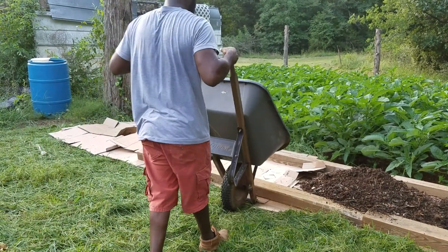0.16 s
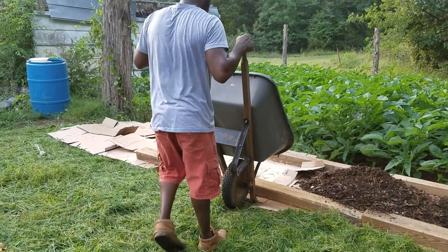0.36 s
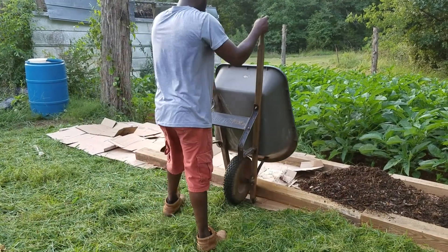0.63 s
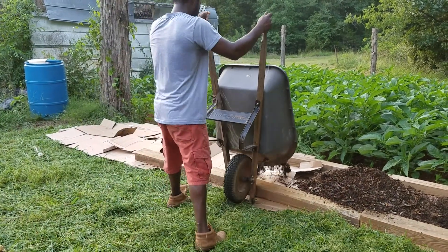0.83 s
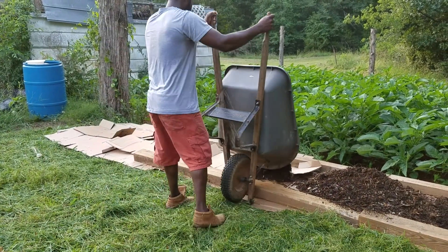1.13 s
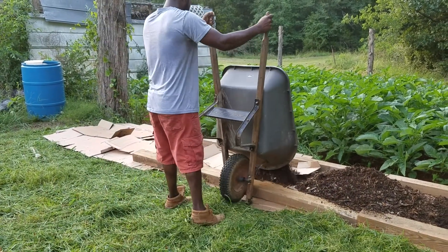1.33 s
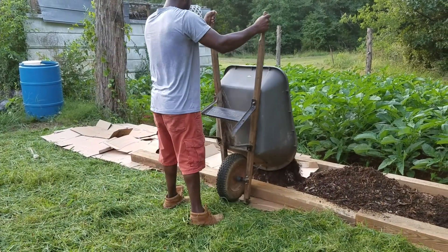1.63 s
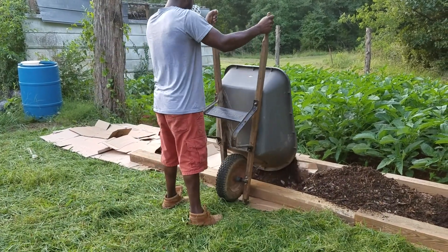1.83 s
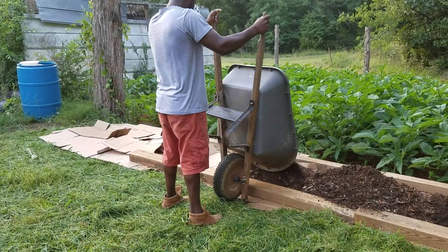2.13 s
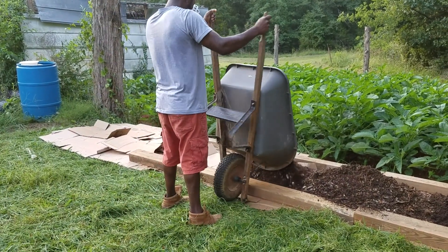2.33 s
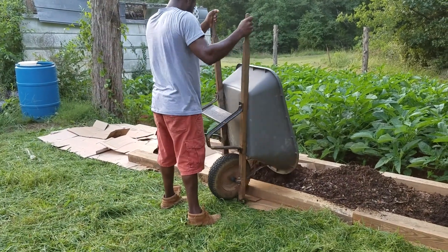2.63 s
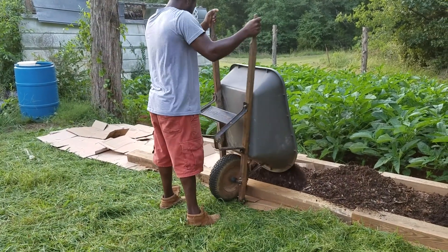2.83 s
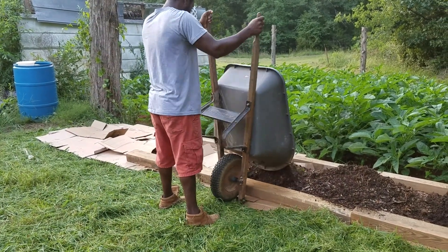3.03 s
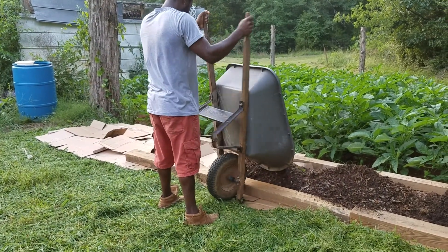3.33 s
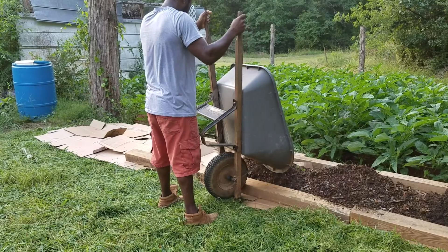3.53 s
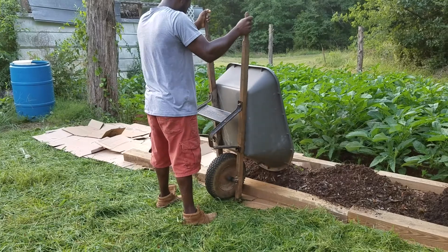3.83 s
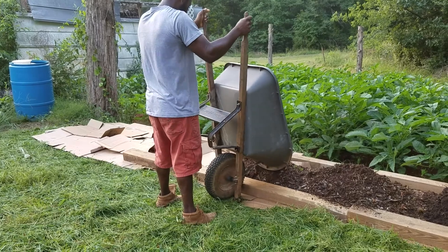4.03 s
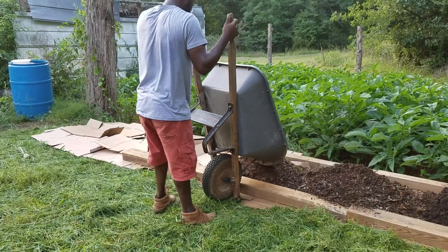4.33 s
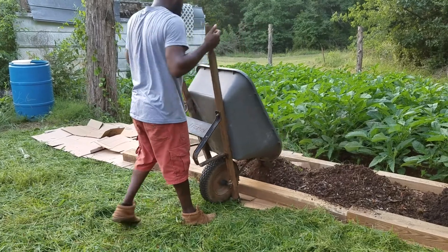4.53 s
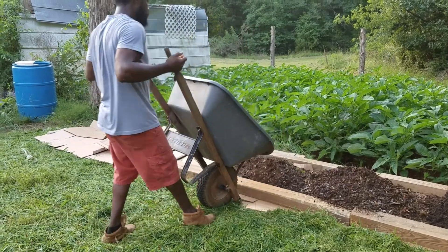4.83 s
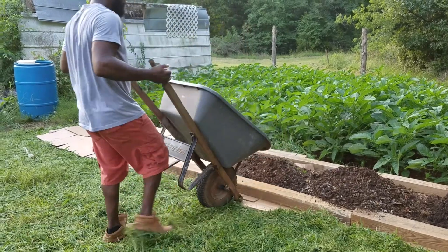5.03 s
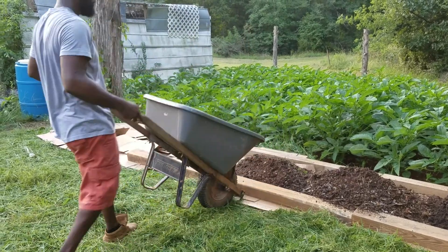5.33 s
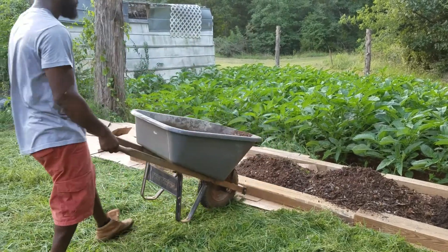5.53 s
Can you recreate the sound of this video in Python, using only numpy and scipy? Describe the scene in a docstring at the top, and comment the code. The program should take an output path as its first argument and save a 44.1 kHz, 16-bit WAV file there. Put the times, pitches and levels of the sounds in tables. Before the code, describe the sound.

A wheelbarrow dumps crunching mulch, then gives a run of hollow metal knocks and rattles, with faint insects in the garden.

```python
"""Summer insects buzz in a garden and grass swishes as a wheelbarrow of bark mulch is tipped up.
The load slides out as a crackle of tiny random impacts; chips snap and damp clods thud down.
Shaken empty, the thin tray knocks and rattles on its frame. Bending waves in a sheet are dispersive,
so each blow spreads as a short falling chirp over the tub's hollow resonance.
Last, the barrow rolls back and is lowered onto the lawn."""
import sys
import numpy as np
from scipy import signal
from scipy.fft import rfft, irfft, next_fast_len
from scipy.io import wavfile
from scipy.ndimage import uniform_filter1d

SR = 44100
rng = np.random.default_rng(int(sys.argv[2]) if len(sys.argv) > 2 else 0)


def wav_record(signal):
    """Record a signal, one row per channel, as 16-bit PCM in the file named by sys.argv[1]."""
    frames = np.transpose(np.atleast_2d(signal))
    bounded = np.clip(frames, -1, 1)
    # unit amplitude maps onto the largest positive 16-bit level
    quanta = np.round(bounded * 32767).astype(np.int16)
    wavfile.write(sys.argv[1], SR, quanta)


N = 250047
RING = 16384  # samples given to one impact
CHATTER_S = 0.00494  # usual length of a blow's chatter

# Blows on the tray: (time [s], thud level [dB], clack over thud [dB], tick over thud [dB],
# chatter length [s], hollow note [Hz], note level [dB], clack resonance [Hz])
BLOWS = [(.773, -39.5, -6, -15.5, 0.0023, 355, -46, 1200), (1.194, -37.5, 4, -8, 0.0074, 559, -38.5, 2100),
         (1.398, -35.5, -14.5, -26, 0.0037, 337, -52, 1100), (1.419, -51.5, 6, 1, 0.0041, 402, -54, 1230),
         (1.429, -39.5, 2, -17, .0086, 552, -42, 2110), (1.623, -37.5, -1.5, -26.5, 0.0028, 293, -40, 1140),
         (1.670, -40, 5, -7.5, 0.012, 538, -33.5, 2120), (1.858, -37, 4.5, -15, 0.0026, 330, -37, 1100),
         (1.865, -33.5, 1, -15, 0.0051, 326, -50, 1400), (1.924, -41, -1.5, -24, 0.007, 437, -41, 1770),
         (2.055, -38.5, -6, -4.5, 0.0031, 395, -41.5, 1190),
         (2.139, -32, 1.5, -10.5, 0.0035, 204, -33.5, 1200), (2.157, -37, 4, -2.5, .0036, 420, -41, 2700),
         (2.355, -42.5, 0.5, -10, 0.0031, 360, -43.5, 1200), (2.601, -38, 1, -20, 0.0062, 312, -51, 2520),
         (2.62, -36, -12, -11.5, 0.0049, 328, -49, 1300), (2.71, -39, -5, -8.5, .0036, 355, -49, 1290),
         (2.879, -38.5, -13, -26, 0.0039, 204, -41, 1200), (2.894, -42.5, 4, -16, 0.0094, 360, -40, 1860),
         (2.915, -42, 2.5, -5.5, 0.0044, 366, -46, 1400), (2.962, -31, -1, -2.5, 0.0032, 412, -32.5, 1280),
         (2.989, -42, -1, -21, 0.0033, 340, -44, 1300), (3.189, -36.5, -5, -16.5, 0.0044, 238, -37.5, 1400),
         (3.273, -41, 0, -35, 0.0077, 538, -45, 1740), (3.382, -47, -8, -2, 0.0067, 377, -46, 1320),
         (3.395, -39.5, 4.5, 6.5, .0034, 425, -39, 2610), (3.478, -37.5, 1.5, -3, 0.0081, 450, -38, 2480),
         (3.493, -37.5, 0, -3.5, 0.0058, 436, -41, 2500), (3.527, -39.5, -0.5, 6, .0033, 327, -43, 4700),
         (3.612, -37, -4, -.5, 0.0031, 422, -32, 1120), (3.63, -36, -13, -3.5, 0.0066, 411, -45, 1130),
         (3.708, -33.5, 4.5, 2, 0.011, 637, -39, 3070), (3.806, -44, -9, -13, 0.0072, 416, -38.5, 1300),
         (3.816, -35.5, 2.5, 4, .0028, 430, -38.5, 2820), (3.890, -33, 5, -1.5, 0.012, 534, -33.5, 3010),
         (3.985, -39, -2.5, -7.5, 0.0032, 583, -45, 1230), (4.183, -61.5, 6.5, -18, 0.0067, 428, -65, 2960),
         (4.711, -61, -21, -23, 0.0062, 385, -63, 1210), (5.363, -55.5, 6.5, -3, .0036, 461, -61, 1490)]
# Spectra of the tray's thud, soft bumps, crunching bark and fine bits: (frequency [Hz], level [dB])
THUD_SPECTRUM = [(25, -32), (70, -1.5), (130, -1.5), (195, -4), (250, -4.5), (340, -2.5), (560, -3),
                 (760, -6.5), (1200, -8.5), (3000, -59)]
RUMBLE_SPECTRUM = [(20, -39), (45, -8.5), (80, 3), (140, 4), (195, 4), (250, -1), (420, 2), (560, -6),
                   (720, -4), (1500, -27)]
CRUNCH_SPECTRUM = [(40, -19), (150, -7.5), (400, 3), (680, -6), (1050, 5), (1900, -1.5), (3000, -2.5),
                   (4300, -10.5), (5500, -23.5), (9000, -26), (16000, -42)]
HISS_SPECTRUM = [(2500, -9), (5000, 1.5), (7500, 5), (9500, 4.5), (11000, 7), (13000, 2), (14500, 9),
                 (16000, -6.5)]


def undb(db):
    """Decibels to amplitude ratio."""
    return 10 ** (np.asarray(db) / 20)


def freqs(size):
    """Frequencies of the Fourier bins, at least 1 Hz."""
    return np.maximum(np.arange(size // 2 + 1) * SR / size, 1)


def shape(points, f):
    """Interpolate (frequency, value) points on a logarithmic frequency axis."""
    hz, values = np.transpose(points)
    return np.interp(np.log(f), np.log(hz), values)


def colour(x, points, centre_hz=1000, focus_db=0):
    """Minimum-phase filter of a given spectrum, less focus_db per squared octave up to two octaves out."""
    n = x.shape[-1]
    size = 2 * next_fast_len(n)
    f = freqs(size)
    db = shape(points, f) - focus_db * np.minimum(np.log2(f / centre_hz) ** 2, 4)
    cepstrum = irfft(np.log(undb(db)))
    cepstrum[1:size // 2] *= 2  # folding the cepstrum makes the filter causal
    cepstrum[size // 2 + 1:] = 0
    return irfft(rfft(x, size) * np.exp(rfft(cepstrum)), size)[..., :n]


def resonate(x, hz, peak_db, octaves):
    """A single resonance, reaching this many octaves to each side."""
    return colour(x, [(hz / 2 ** octaves, 0), (hz, peak_db), (hz * 2 ** octaves, 0)])


def unit(x):
    """Normalise each row to rms 1."""
    return x / np.sqrt(np.mean(x ** 2, axis=-1, keepdims=True))


def burst(x, db):
    """Set the rms level of a transient's first 30 ms."""
    head = x[:, :int(.03 * SR)]
    return x * undb(db) / np.sqrt(np.mean(head ** 2, axis=-1, keepdims=True))


def add(out, s, x):
    """Superpose a sound at time s."""
    i = max(int(s * SR), 0)
    out[:, i:i + x.shape[1]] += x[:, :N - i]


def walk(rate):
    """Smooth random fluctuation with spread near 1 and `rate` new values a second."""
    hold = max(int(SR / rate), 1)
    steps = np.repeat(rng.standard_normal(N // hold + 1), hold)
    return 1.3 * uniform_filter1d(steps, hold)[:N]


def swell(s, half):
    """Gaussian envelope around time s."""
    return np.exp(-((np.arange(N) / SR - s) / half) ** 2)


def grains(rate, spread_db, size):
    """Shot noise as mid and side: `rate` random impacts a second, a few much larger than the rest."""
    hit = rng.random(size) < rate / SR
    strength = undb(spread_db * np.minimum(rng.exponential(size=size), 4))
    return hit * strength * rng.standard_normal((2, size))


def garden(level_db=-60.0):
    """Distant air and leaves merge into a soft broadband noise."""
    # Outdoor murmur: (frequency [Hz], level [dB])
    spectrum = [(20, -20), (150, -16), (250, -2.5), (430, -0.5), (560, 0), (750, -8), (1300, -11.5),
                (3000, -12), (5000, -19), (16000, -16)]
    return unit(colour(rng.standard_normal((2, N)), spectrum)) * undb(level_db + 0.24 * walk(3.3))


def insects(swell_db=1):
    """Amplitude modulation: each kind of insect rasps in its own noise band, pulsed at its wing rate."""
    # Kinds of insect: (centre [Hz], bandwidth [Hz], level [dB], pulse rate [Hz], pulse depth [0-1],
    # left minus right [dB])
    chorus = [(6637, 350, -61, 32, 0.12, -12.5), (7130, 880, -67, 28, 0.2, 24),
              (7570, 370, -67, 39, 0.5, -14), (9590, 210, -62.5, 78, 0.45, -0.5),
              (9300, 840, -61.5, 40, 0, -7), (14000, 3800, -67, 83, 0.5, -1)]
    out, f = 0, freqs(N)
    for hz, width, db, rate, depth, pan_db in chorus:
        noise = rng.standard_normal((2, N)) + 1.96 * rng.standard_normal(N)  # mostly common to both ears
        rasp = irfft(rfft(noise) / np.sqrt(1 + (2 * (f - hz) / width) ** 4), N)
        cycles = np.cumsum(rate * (1 + 0.013 * walk(6.46))) / SR
        strokes = 1 + depth * np.sin(2 * np.pi * cycles)
        gain = undb(db + swell_db * walk(3.14) + np.array([[pan_db], [-pan_db]]) / 2)
        out = out + unit(rasp * strokes) * gain
    return out


def grass():
    """Friction noise: blades crackle and hiss as shoes and wheel brush the lawn."""
    # Brushes through the grass: (time [s], half length [s], rustle level [dB], hiss level [dB])
    swishes = [(.1, 0.34, -68, -56.5), (4.223, 0.018, -57, -57), (4.512, 0.078, -72.5, -67),
               (4.968, 0.19, -63.5, -58.5), (5.32, 0.087, -57, -56.5)]
    rustle = unit(colour(grains(2000, 2.9, N), CRUNCH_SPECTRUM))
    hiss = unit(colour(grains(8000, 3.7, N), HISS_SPECTRUM))
    return sum(swell(s, half) * (undb(rustle_db) * rustle + undb(hiss_db) * hiss)
               for s, half, rustle_db, hiss_db in swishes)


def crunching(contacts_per_s=1900, spread_db=1.0, ring_s=0.0017):
    """Bark rubs on bark; each contact is an impulse followed by a heavily damped ring."""
    ring = rng.standard_normal((2, RING)) * np.exp(-np.arange(RING) / SR / ring_s)
    contacts = grains(contacts_per_s, spread_db, N)
    ringing = signal.fftconvolve(contacts, ring, axes=1)[:, :N]
    return unit(colour(unit(contacts) + unit(ringing), CRUNCH_SPECTRUM))


def mulch(hiss_db=-4, empty_s=4.22, fade_s=0.44):
    """Granular flow in uneven spurts: chips crunch, fine bits hiss and clumps drum on the tray."""
    # Flow over the lip: (time [s], crunch level [dB])
    flow_levels = [(0, -66), (.2, -50.5), (.45, -48.5), (.7, -49), (.95, -46.5), (1.25, -52), (1.7, -48.5),
                   (2.15, -51.5), (2.42, -58), (2.8, -55.5), (3.25, -53.5), (3.85, -49), (4.05, -61),
                   (4.3, -69.5)]
    # Clumps that slide off at once: (time [s], half length [s], crunch level [dB], hiss level [dB])
    clumps = [(0.475, 0.031, -54, -56), (0.838, 0.025, -38.5, -47.5), (0.91, 0.03, -45, -75),
              (1.015, 0.03, -44.5, -77), (2.635, 0.08, -46, -57)]
    t = np.arange(N) / SR
    flow = undb(np.interp(t, *np.transpose(flow_levels)))
    coarse = flow + sum(undb(db) * swell(s, half) for s, half, db, _ in clumps)
    fine = flow * undb(hiss_db) + sum(undb(db) * swell(s, half) for s, half, _, db in clumps)
    spurts = walk(60)
    rumble = unit(colour(grains(900, 0.68, N), RUMBLE_SPECTRUM)) * drumming() * undb(1.2 * spurts)
    crunch = crunching() * coarse * undb(2.04 * spurts)
    hiss = unit(colour(grains(14000, 3.5, N), HISS_SPECTRUM)) * fine * undb(0.33 * spurts)
    remaining = np.clip(1 - (t - empty_s) / fade_s, 0, 1)
    return (rumble + crunch + hiss) * remaining


def chips(break_db=-2, decay_s=0.0044, tail_db=-20, tail_s=.02, thud_db=-12):
    """Brittle fracture of bark: a pitched snap, trailing crumbs and a small thud in the laden tray."""
    # Loudest cracks as the load breaks loose: (time [s], level [dB], pitch [Hz])
    cracks = [(.142, -46, 970), (0.165, -50, 1190), (.179, -49, 990), (0.214, -52.5, 1810),
              (0.24, -44, 1750), (.272, -48, 1900), (.296, -43.5, 1820), (.313, -42.5, 1920),
              (0.348, -47.5, 1210), (.372, -48.5, 2600), (.490, -33, 1200), (.507, -42.5, 1870),
              (0.532, -35, 1400), (0.539, -42, 1150), (.589, -43, 1310), (.695, -46.5, 1880),
              (.752, -40, 1280), (.797, -40.5, 1140), (.804, -37.5, 1250), (.816, -38, 1660),
              (0.885, -37.5, 1900), (0.904, -38.5, 1200), (.99, -43.5, 1090), (1.094, -51.5, 1690),
              (1.314, -55, 3270)]
    out, t = np.zeros((2, N)), np.arange(RING) / SR
    from_s, to_s, count = 0.36, 1.1, 12  # smaller snaps in between
    small = [(from_s + (to_s - from_s) * (k + rng.random()) / count,
              rng.normal(-52.5, 7),
              1400 * 2 ** rng.uniform(-0.3, 0.97)) for k in range(count)]
    decay = np.exp(-t / decay_s) + undb(tail_db) * np.exp(-t / tail_s)
    for s, db, hz in cracks + small:
        crumbs = unit(grains(9000, 1.8, RING) * decay) / np.sqrt(RING)
        snap = crumbs + undb(break_db) * (t == 0)
        bark = colour(snap, CRUNCH_SPECTRUM, 1270, focus_db=1.14)
        add(out, s, burst(resonate(bark, hz, peak_db=8, octaves=.35), db))
        add(out, s, burst(colour(snap, THUD_SPECTRUM, 252, focus_db=4.5), db + thud_db))
    return out


def clods(contact_s=0.014, crumble_db=-3):
    """Soft impacts carry mostly low frequencies: damp clods land with a dull bump and fall apart."""
    # Landings: (time [s], level [dB], pitch [Hz])
    landings = [(.491, -41.5, 234), (.534, -48, 250), (.997, -43.5, 258), (1.019, -45.5, 230),
                (1.14, -50, 157), (1.366, -44.5, 322), (1.44, -44.5, 122), (1.577, -43.5, 208),
                (1.681, -36.5, 142), (1.705, -40, 172), (1.741, -45, 109), (1.793, -44.5, 184),
                (2.27, -44, 170), (2.298, -44.5, 192), (2.733, -44, 147), (2.913, -36, 154),
                (3.032, -38.5, 140), (3.278, -40.5, 131), (3.366, -40, 116.4), (3.411, -39.5, 138),
                (3.625, -39, 135), (3.748, -43, 192)]
    out, t = np.zeros((2, N)), np.arange(RING) / SR
    for s, db, hz in landings:
        crumble = unit(grains(1500, 0.99, RING) * np.exp(-t / contact_s)) / np.sqrt(RING)
        bump = colour((t == 0) + undb(crumble_db) * crumble, RUMBLE_SPECTRUM, hz, focus_db=5.5)
        add(out, s, burst(resonate(bump, hz, peak_db=10, octaves=0.33), db))
    return out


def tray_response(ring_db=-3, wash_db=-9, wash_t60=.1):
    """Impulse response of the tray: the blow, damped modes in random phase and a wash of weaker ones."""
    # Main modes: (frequency [Hz], relative level [dB], time to fall 60 dB [s])
    tray_modes = [(82.6, 2.5, 0.54), (125.2, 2.5, 0.27), (156.7, -4.5, 0.18), (190.2, 5.5, 0.38),
                  (293, -1, 0.14), (349, -5, 0.17), (421, -4.5, 0.42), (547, 0, 0.31), (653, 3, .13),
                  (1185, -8, 0.19), (1695, 6, .1), (1860, 8, 0.032), (2850, 6.5, 0.052), (3130, -11, 0.27),
                  (4350, -2, .22), (9730, 14, 0.032), (11700, -7, .05)]
    t = np.arange(RING) / SR
    hz, db, t60 = np.transpose(tray_modes)[:, :, None]
    hz = hz * (1 + 0.0036 * rng.standard_normal(hz.shape))
    modes = np.sin(2 * np.pi * (hz * t + rng.random(hz.shape))) * np.exp(-np.log(1000) * t / t60)
    weight = undb(db + ring_db) * np.sqrt(4000 / t60) / SR
    wash = unit(rng.standard_normal((2, RING)) * np.exp(-np.log(1000) * t / wash_t60)) / np.sqrt(RING)
    return (t == 0) + (weight * modes).sum(axis=0) + undb(wash_db) * wash


def dispersion(travel_s, slow_hz=1000, fast_hz=4200):
    """Transfer function of the sheet: bending waves speed up as the root of frequency, so lows lag."""
    delay_s = travel_s * (np.sqrt(fast_hz / np.clip(freqs(RING), slow_hz, fast_hz)) - 1)
    return np.exp(-2j * np.pi * np.cumsum(delay_s) * SR / RING)


def brightness(s, chatter_s, laden_until_s=2.9, bare_by_s=3.97):
    """Mass loading: thud and clack centres [Hz] rise as the load leaves, and vary with chatter length."""
    def by_load(laden, bare):
        return np.interp(s, [laden_until_s, bare_by_s], [laden, bare])
    drawn_out = chatter_s / CHATTER_S
    thud_hz = by_load(314, 430) * drawn_out ** by_load(0.43, 0.24)
    clack_hz = by_load(2270, 2700) * drawn_out ** by_load(0.44, -0.037)
    return thud_hz, clack_hz


def knock(s, thud_db, clack_rel_db, tick_rel_db, chatter_s, spot_hz, stiff_s=0.00198):
    """Impact excitation: a blow and its chatter drive the sheet, which radiates thud, clack and tick."""
    # Spectra of the sheet's clack and the contacts' tick: (frequency [Hz], level [dB])
    clack_spectrum = [(300, -29), (750, -3.5), (1150, 11.5), (1500, 1), (3100, -0.5), (4400, -7.5),
                      (5400, -12.5), (9000, 4), (16000, -68)]
    tick_spectrum = [(2000, -5.5), (4200, 11.5), (5600, 9), (7000, 2.5), (9300, 11), (10300, -0.5),
                     (11400, 4.5), (12500, -20), (15500, -9)]
    t = np.arange(RING) / SR
    thud_hz, clack_hz = brightness(s, chatter_s)
    contact = np.exp(-(t / (1.66 * chatter_s)) ** 2.8)
    chatter = unit(grains(5000, 0.8, RING) * contact) / np.sqrt(RING)
    force = chatter + undb(-1) * (t == 0)
    bend = dispersion(travel_s=.6 * max(chatter_s - stiff_s, 0))
    tray = rfft(tray_response())
    fade = np.clip(2 - 2 * t / t[-1], 0, 1) ** 2
    sheet = irfft(rfft(force) * bend * tray) * fade
    push = undb(-8.5) * stiff_s / chatter_s * irfft(bend)  # a short blow also shoves the whole tray
    thud = colour(sheet + push, THUD_SPECTRUM, thud_hz, focus_db=6.5)
    clack = colour(sheet, clack_spectrum, clack_hz, focus_db=5.5)
    clack = resonate(clack, spot_hz, peak_db=5.5, octaves=0.18)
    tick = colour(irfft(rfft(chatter) * tray) * fade, tick_spectrum)  # straight into the air, undispersed
    clack_db, tick_db = thud_db + clack_rel_db, thud_db + tick_rel_db
    return burst(thud, thud_db) + burst(clack, clack_db) + burst(tick, tick_db) + spray(tick_db, chatter_s)


def spray(tick_db, chatter_s, share_db=-4, full_s=0.0066):
    """Secondary impacts: grit thrown off the sheet patters back, the more the longer a blow chatters."""
    age = np.arange(RING) / SR / chatter_s
    grit = colour(grains(2300, 4.5, RING) * age * np.exp(-1.7 * age), HISS_SPECTRUM)
    return burst(grit, tick_db + share_db) * min(chatter_s / full_s, 1)


def hollow(hz, db, chatter_s, t60=0.11, rough_db=-16, scrape_s=0.025):
    """The tub's resonance, tuned by striking point and load, builds up as a blow chatters, then decays."""
    t = np.arange(RING) / SR
    build_up = 1 - np.exp(-t / (0.29 * chatter_s))
    ring = np.sin(2 * np.pi * hz * t) * np.exp(-np.log(1000) * t / t60) * build_up
    scrape = unit(rng.standard_normal((2, RING)) * np.exp(-t / scrape_s)) / np.sqrt(RING)
    force = (t == 0) + undb(rough_db) * scrape
    return burst(irfft(rfft(ring) * rfft(force)), db)


def rattle(lag_s=0.025, fainter_db=-15, duller_db=-5):
    """Superposed impacts: the tray knocks and rattles; a faint, duller knock is added after each blow."""
    out = np.zeros((2, N))
    for s, thud_db, clack_rel_db, tick_rel_db, chatter_s, note_hz, note_db, spot_hz in BLOWS:
        blow = knock(s, thud_db, clack_rel_db, tick_rel_db, chatter_s, spot_hz)
        add(out, s, blow + hollow(note_hz, note_db, chatter_s))
        faint_knock = knock(s, thud_db + fainter_db, clack_rel_db + duller_db, tick_rel_db + duller_db,
                            CHATTER_S, spot_hz)
        add(out, s + lag_s, faint_knock)
    return out


def drumming(steady_db=-51, stir_db=-8.5, settle_s=0.11):
    """Envelope of mulch drumming on the tray: each blow stirs up more, and incoherent powers add."""
    t = np.arange(N) / SR
    power = undb(steady_db) ** 2
    for s, thud_db, *_ in BLOWS:
        stirred = (t > s) * undb(thud_db + stir_db) * np.exp(-np.abs(t - s) / settle_s)
        power = power + stirred ** 2
    shaking = np.interp(t, [0.79, 1.03, 3.5, 4.44], [0, 1, 1, 0])
    return np.sqrt(power) * shaking


def rolling(from_s=4.08, to_s=4.9, jolts_per_s=70, level_db=-64.5):
    """Structure-borne sound: jolts of the wheel on the uneven lawn excite the empty tub's resonance."""
    t = np.arange(N) / SR
    jolts = colour(grains(jolts_per_s, 0.27, N), THUD_SPECTRUM, 460, focus_db=4.0)
    tub = resonate(jolts, 416, peak_db=7, octaves=0.64)
    moving = np.clip(np.minimum(t - from_s, to_s - t) * 20, 0, 1)
    return unit(tub) * undb(level_db) * moving


def stereo(x):
    """Mid-side decoding: the treble is wide, and left and right differ in level and phase."""
    # Stereo width: (frequency [Hz], side minus mid [dB])
    side_levels = [(60, -15), (400, -19), (1200, -13), (2500, -10), (4500, -5.5), (9000, -7), (15000, -8)]
    # Level difference: (frequency [Hz], left minus right [dB])
    balance = [(30, 6), (70, 11), (130, 1), (300, 0.4), (800, -2.5), (2500, -0.5), (9000, 2.5), (15000, -2)]
    # Phase difference: (frequency [Hz], lead of the left [rad])
    phase_lead = [(30, -.8), (120, -.65), (300, -.42), (1000, -.4), (3000, -.45), (5000, -.6), (9000, 0),
                  (15000, 0)]
    f = freqs(N)
    mid, side = rfft(x)
    width = undb(shape(side_levels, f))
    lean = undb(shape(balance, f) / 2) * np.exp(.5j * shape(phase_lead, f))
    return irfft(np.array([(mid + width * side) * lean, (mid - width * side) / lean]), N)


def scene():
    """Superposition of the barrow, its load and the open garden."""
    return stereo(rattle() + chips() + clods() + mulch() + rolling() + grass() + garden()) + insects()


def record(dry, top_hz=16200):
    """A steep elliptic low-pass filter cuts the highest treble."""
    return signal.sosfilt(signal.ellip(10, .2, 70, top_hz, fs=SR, output="sos"), dry)


dry = scene()
out = record(dry)
wav_record(out)
```